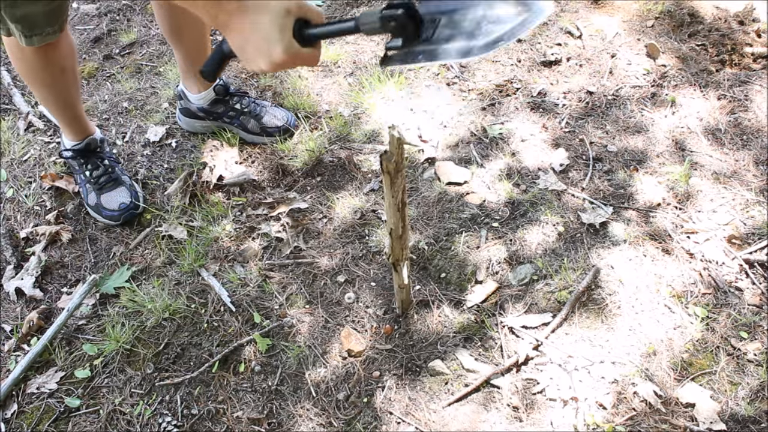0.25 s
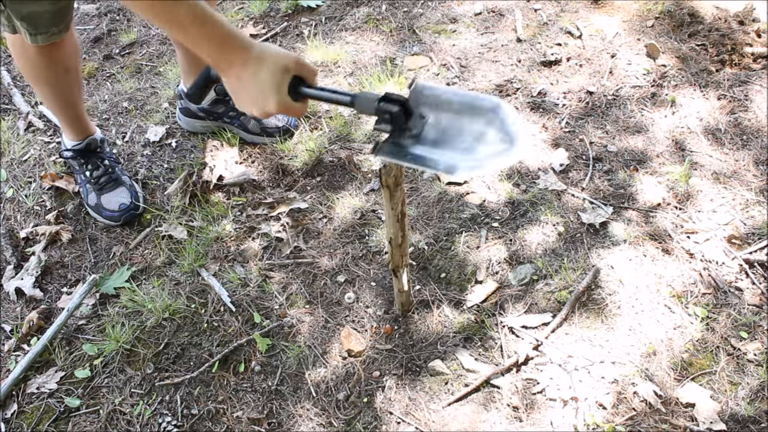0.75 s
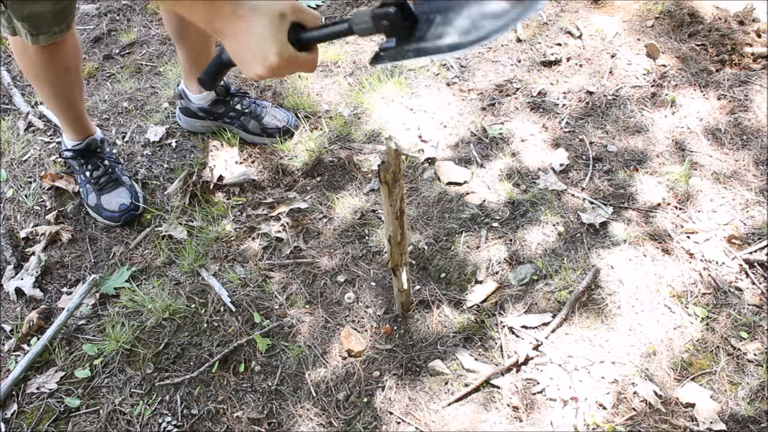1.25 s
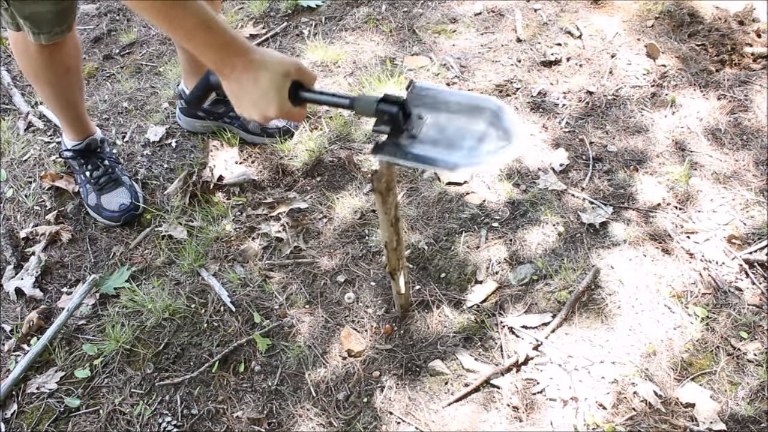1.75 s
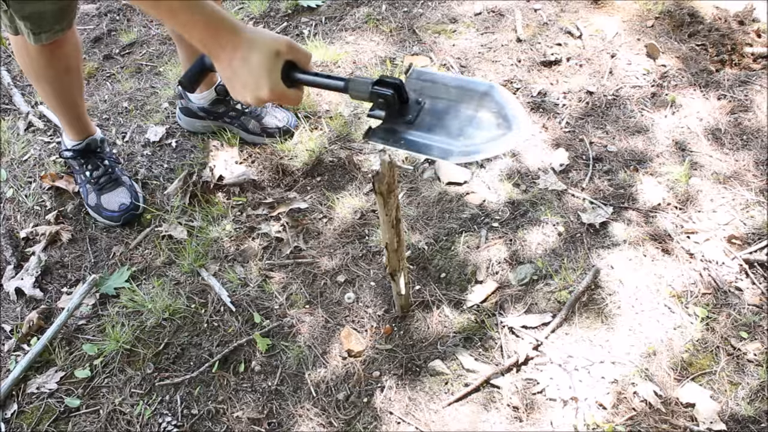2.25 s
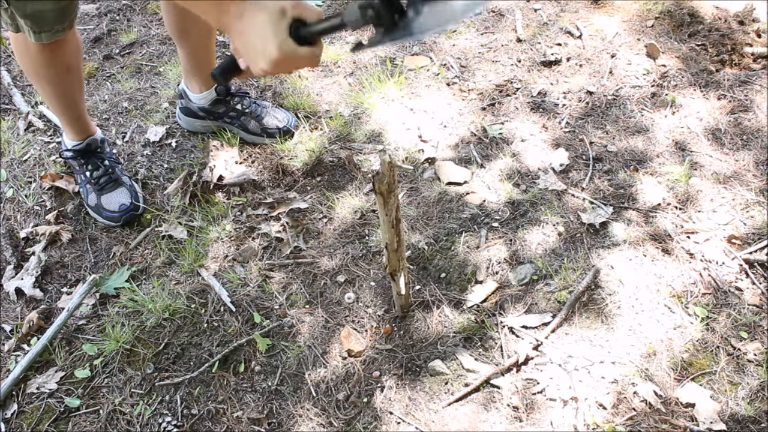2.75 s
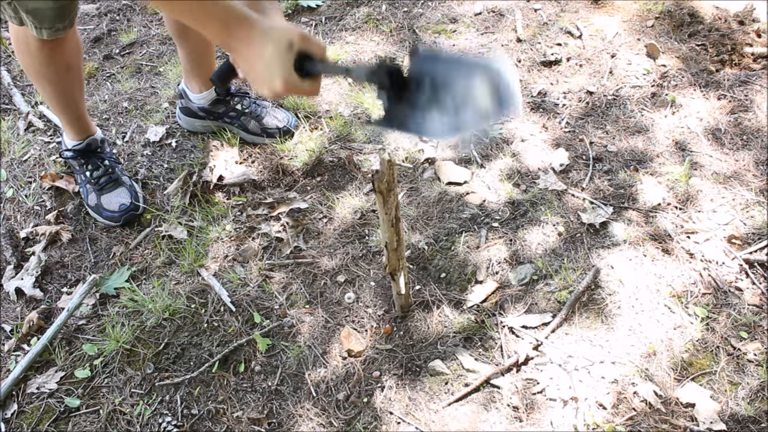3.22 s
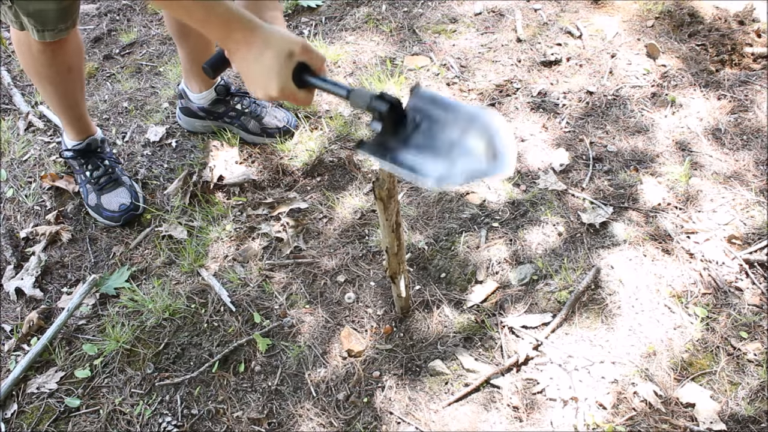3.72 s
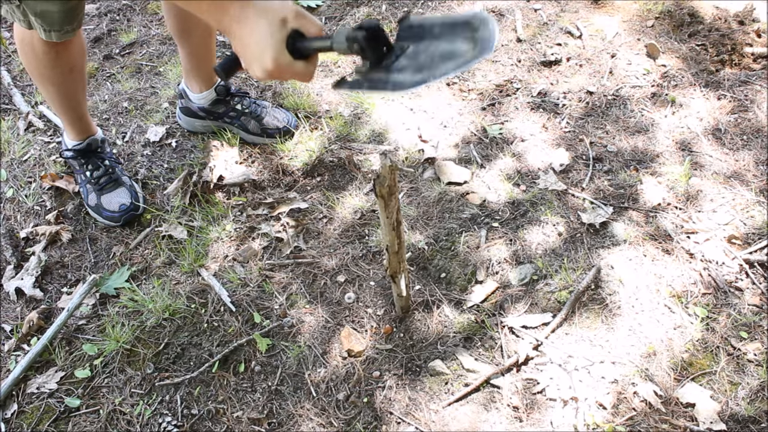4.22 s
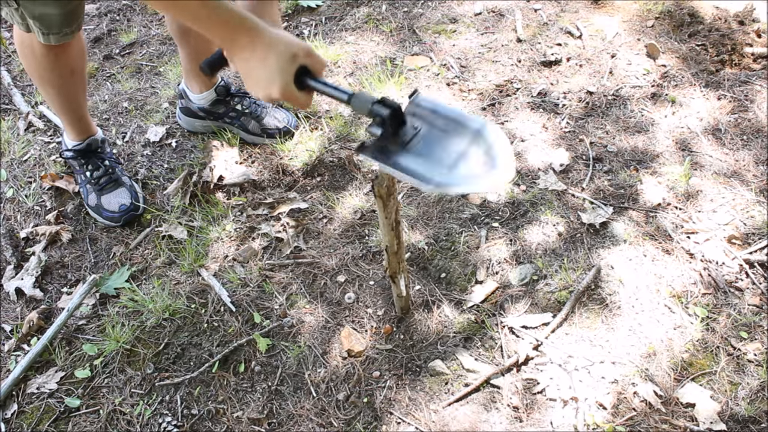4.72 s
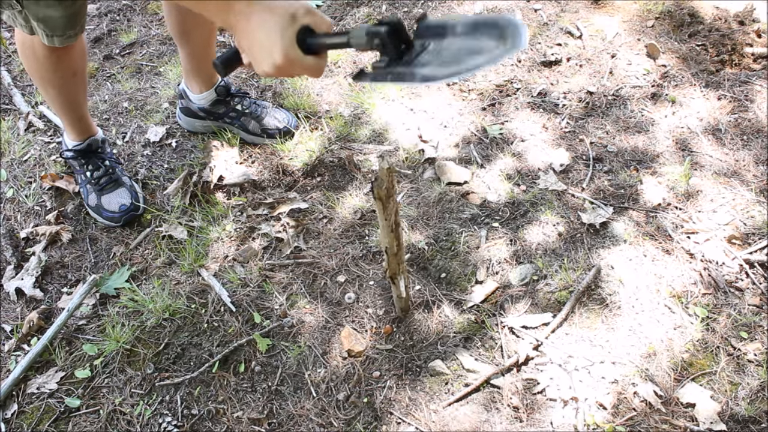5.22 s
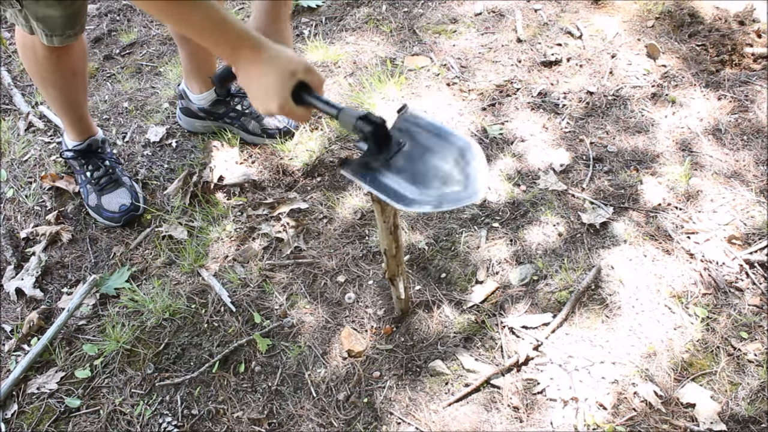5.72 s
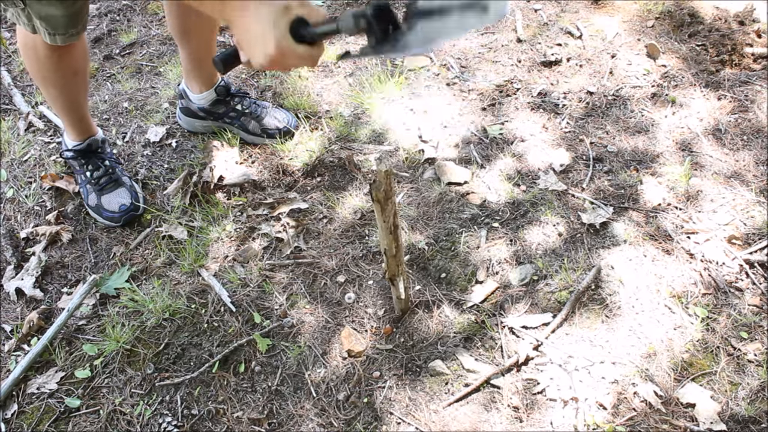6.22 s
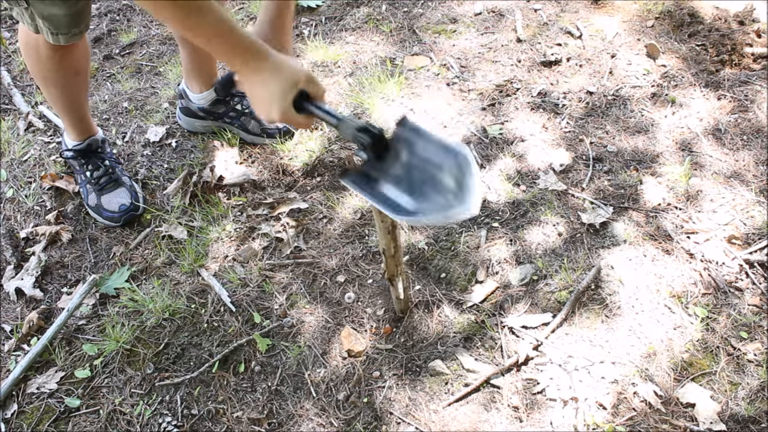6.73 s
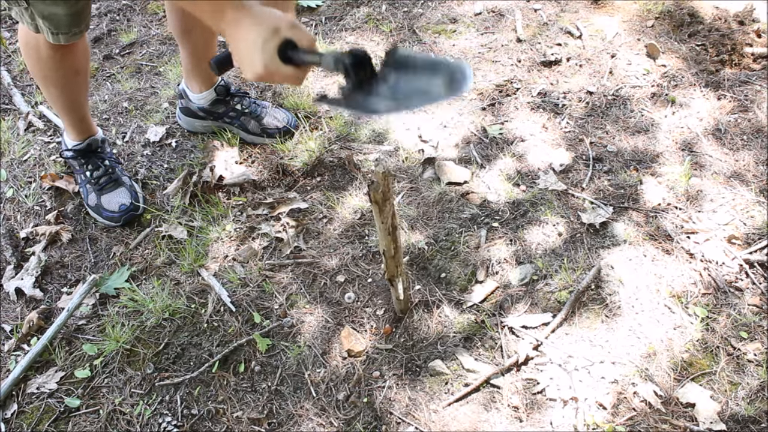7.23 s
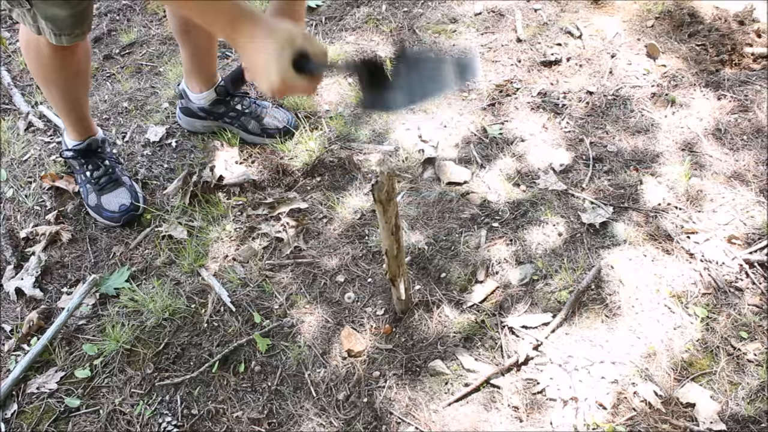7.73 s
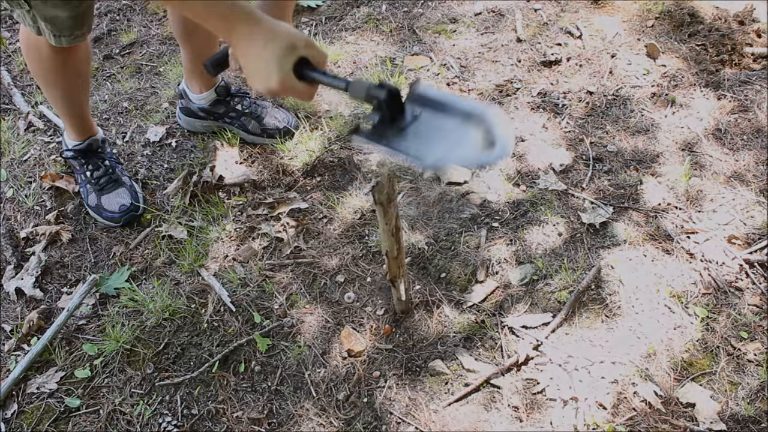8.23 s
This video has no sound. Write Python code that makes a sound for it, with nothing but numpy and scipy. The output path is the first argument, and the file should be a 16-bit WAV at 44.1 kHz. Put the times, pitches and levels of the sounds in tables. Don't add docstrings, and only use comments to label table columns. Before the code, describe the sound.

Steady, overloaded metallic clanks of a folding shovel hammering a stake outdoors, with ringing blade, loose joint ticks and faint insect chirps.

```python
import sys
import numpy as np
from scipy import signal
from scipy.fft import rfft, irfft, next_fast_len
from scipy.io import wavfile

SR = 44100
rng = np.random.default_rng(int(sys.argv[2]) if len(sys.argv) > 2 else 0)


def ratio_of_db(decibels):
    return 10 ** (np.asarray(decibels, float) / 20)


def digitize_waveform(pressure):
    field = np.atleast_2d(pressure).T
    bounded = np.clip(field, -1, 1)
    quanta = np.round(bounded * 32767).astype(np.int16)
    wavfile.write(sys.argv[1], SR, quanta)


N = 373292
AFTER = np.arange(SR // 5) / SR


def unit(x):
    return x / np.sqrt(np.mean(x ** 2) + 1e-20)


def along(points, hz):
    f, v = np.transpose(points)
    return np.interp(np.log(hz + 1), np.log(f + 1), v)


def curves(rows):
    s, *cols = np.transpose(rows)
    return [np.interp(np.arange(N) / SR, s, c) for c in cols]


def wobble(rate, size=N):
    knots = rng.standard_normal(512)
    return np.interp(np.arange(size) * rate / SR, np.arange(len(knots)), knots)


def filtered(x, response):
    m = next_fast_len(len(x) + SR // 2)
    return irfft(rfft(x, m) * response(np.fft.rfftfreq(m, 1 / SR)), m)[:len(x)]


def add(track, s, x):
    part = track[round(s * SR):][:len(x)]
    part += x[:len(part)]


# t/s, firmness/0-1
FIRMNESS = [(0, .05), (2.3, 0.2), (3.2, 0.3), (4.5, .6), (6, 1), (7.3, .95), (8.4, 0.5)]


def sunk(s, loose, firm):
    return loose + (firm - loose) * np.interp(s, *np.transpose(FIRMNESS))


# f/Hz, level/dB per Hz
HUM_SPECTRUM = [(30, -4), (90, 0.5), (280, -4), (700, -2), (1400, -0.5), (2200, -5), (4000, -7.5),
                (6000, -15.5), (9500, -23), (15600, -24.5), (15900, -60)]
# t/s, level/dB rms of its low band
AIR_LEVEL = [(0, -58.5), (.6, -63.5), (1.3, -65), (2.4, -68.5), (2.62, -59), (2.75, -55), (2.95, -59.5),
             (3.2, -66.5), (4.5, -71), (5.6, -74), (7.3, -72.5), (7.75, -65), (8, -65), (8.4, -69.5)]


def air():
    t, blows = np.arange(N) / SR, np.array(BLOW_S + [8.53])
    next_blow = blows[np.searchsorted(blows, t)]
    rise_db = sunk(t, loose=7, firm=8.5) * np.exp((t - next_blow) / 0.038)
    gain_db, = curves(AIR_LEVEL)
    hum = unit(filtered(rng.standard_normal(N), lambda f: ratio_of_db(along(HUM_SPECTRUM, f))))
    return ratio_of_db(gain_db + rise_db + 10.5 + 1.2 * wobble(6.5)) * hum


# t/s, level/dB
CRICKET_CHIRPS = [(.48, -57), (2.372, -61), (2.679, -53), (3.295, -55), (3.63, -59), (4.7, -62),
                  (6.58, -68), (6.93, -68), (7.58, -62), (7.83, -62), (8.13, -64)]


def cricket():
    out, t = np.zeros(N), AFTER[AFTER < .042]
    stroke = t / .007 % 1
    tone = np.sin(2 * np.pi * np.cumsum(9250 - 550 * stroke ** 2) / SR)
    for s, db in CRICKET_CHIRPS:
        swell = ratio_of_db(db + 3 + 180 * (t - .03))
        add(out, s, swell * np.sin(np.pi * stroke) * tone)
    return out


# f/Hz, level/dB per Hz
SCATTER_SPECTRUM = [(100, -12), (400, -6), (900, -6), (1900, 9), (2500, -6.5), (4000, 2), (6000, -6.5),
                    (9000, -13.5), (15000, -27)]
# f/Hz, t60/s
SCATTER_DECAY = [(150, .12), (1000, 0.35), (1900, 0.2), (4000, 0.53), (15000, 0.29)]


def scatter():
    out = np.zeros(N)
    for s, (db, *_) in zip(BLOW_S, BLOW_SETTINGS):
        hz, t, z = signal.stft(rng.standard_normal(len(AFTER)), SR, nperseg=256)
        streaks_db = rng.normal(0, 5.5, (len(hz), 1))
        t60 = along(SCATTER_DECAY, hz)[:, None]
        fade = .048 * ratio_of_db(streaks_db - 60 * t / t60) + 2.6 * ratio_of_db(-60 * t / .04)
        tail = z * fade * ratio_of_db(along(SCATTER_SPECTRUM, hz))[:, None]
        add(out, s + 0.000998, ratio_of_db(0.61 * db - 9) * signal.istft(tail, SR)[1])
    return out


# t/s, chatter peak level near 2 kHz/dB, bright tick level/dB
JOINT_TICKS = [(0.099, -33, -23.5), (0.293, -37, -86), (0.414, -38, -24.5), (0.487, -40, -35),
               (0.641, -44, -66), (0.771, -36, -24.5), (0.787, -15, -39.5), (0.796, -23.5, -35),
               (0.848, -49, -60), (0.98, -39.5, -91), (1.108, -33.5, -28), (1.19, -54, -59),
               (1.301, -38.5, -39), (1.447, -31, -24.5), (1.65, -47, -50), (1.788, -32, -32.5),
               (1.99, -42.5, -50), (2.215, -38, -41), (2.63, -62, -37), (2.801, -37.5, -47),
               (2.967, -34, -26.5), (3.2, -54.5, -35.5), (5.933, -52, -47), (6.282, -56.5, -45.5),
               (7.493, -20.5, -60), (7.658, -59, -37.5)]
# f/Hz, width/Hz, level/dB
COLLAR_MODES = [(544, 45, 0), (1330, 600, -6.5), (1890, 43, 7.5), (3130, 560, -4.5), (3300, 450, -6),
                (4450, 43, -5.5)]


def collar(f):
    total = 0
    for k, (centre, width, db) in enumerate(COLLAR_MODES):
        damping = 1j * f * width
        total = total + (-1) ** k * ratio_of_db(db) * damping / (centre * centre - f * f + damping)
    return total


def bright(f):
    return ratio_of_db(4) * (1j * f / (3000 + 1j * f) * 9000 / (9000 + 1j * f)) ** 2


def joint():
    chatter, tick, t = np.zeros(N), np.zeros(N), AFTER
    for s, db, tick_db in JOINT_TICKS:
        add(chatter, s, ratio_of_db(db + 22 - 60 * t / 0.045) * rng.standard_normal(len(t)))
        add(tick, s, ratio_of_db(tick_db - 5 - 60 * t / 0.035) * rng.standard_normal(len(t)))
    return filtered(chatter, collar) + filtered(tick, bright)


def dead_db(s, t, loose_s, loose_db, firm_s, firm_db, width):
    return sunk(s, loose_db, firm_db) * np.exp(-((t - sunk(s, loose_s, firm_s)) / width) ** 2)


SHARP_NULLS = {3928.5: (.1, 21, .1, -30, .01), 4442: (.11, 17, .07, 0, .01), 2053: (.21, 10, .15, 14, .012)}


def null(s, t, hz):
    *dead, width = SHARP_NULLS.get(hz, (0, 0, 0, 0, 1))
    loss_db = dead_db(s, t + rng.normal(0, .012), *dead, width)
    return ratio_of_db(-np.maximum(loss_db, 0))


def beam(t, depth, rate):
    return 1 + depth * wobble(rate, size=len(t)) * np.minimum(t / 0.066, 1)


# t/s after a blow, speed/(m/s)
SWING_SPEED = [(0, -0.84), (.14, 1), (.25, 0.11), (.4, -2.5), (.6, -.3), (.7, -0.63)]
# f/Hz, t60/s
LONG_MODES = [(927.9, 1.6), (1476.8, 8), (2683, 4), (3928.5, 1.5)]
# level/dB rms of the four modes, low to high, and the ping
LONG_LEVELS = [(-47.5, -42, -52, -60.5, -77), (-51.5, -44, -45, -65, -83), (-60, -53, -40, -45, -84),
               (-62.5, -46, -56, -50.5, -83.5), (-56, -52.5, -34.5, -48.5, -88), (-56, -53, -36, -49, -83),
               (-60, -50, -41, -46.5, -76.5), (-57, -55, -46, -45.5, -82), (-50, -48, -35.5, -35.5, -80.5),
               (-49.5, -47.5, -44, -37, -79), (-52, -48.5, -41, -42, -88), (-44.5, -46, -41.5, -39.5, -75),
               (-53, -51.5, -50, -54.5, -83), (-51.5, -50, -40.5, -40.5, -83),
               (-50.5, -53, -51.5, -42, -86), (-47.5, -50.5, -38.5, -43, -69),
               (-50.5, -51.5, -44.5, -41, -72), (-46.5, -54, -49, -46, -70),
               (-48.5, -60.5, -49, -39.5, -64), (-46.5, -61.5, -45.5, -43, -67),
               (-54.5, -50.5, -50.5, -49.5, -88), (-50, -49.5, -38, -51.5, -85),
               (-43.5, -49.5, -43.5, -39, -83)]
# t/s after the blow, loss/dB (loose stake), t/s, loss/dB (firm stake), width/s
LONG_DEAD = [(.26, 6, 0.24, 19, 0.045), (0.24, 0.76, .24, 5.6, 0.018), (0.041, 3.3, 0.23, 1.4, .07),
             (0.058, 1.5, 0.3, 8.4, 0.05)]
# f/Hz, t60/s
SHORT_MODES = [(2053, .45), (3306, .9), (4442, .7), (5100, .6), (8390, .28)]
SHORT_LEVELS = [(-41, -61, -52, -81.5, -70.5), (-52, -68.5, -55.5, -68, -56.5),
                (-49.5, -65, -52.5, -78, -71.5), (-54.5, -51.5, -65, -72.5, -70),
                (-45.5, -52.5, -50, -65, -79), (-48.5, -50, -51.0, -70.5, -63),
                (-52, -54.5, -45, -66.5, -65.5), (-46, -45, -43, -71, -63), (-48, -55, -43.5, -50.5, -70),
                (-51, -56, -57, -66.0, -68), (-48.5, -56, -46, -58, -59), (-52.0, -52.5, -42.5, -44.5, -57),
                (-55.5, -54.0, -42.5, -70, -73), (-52.5, -66, -45.5, -68, -80),
                (-57.5, -61, -43.5, -56, -78), (-51.0, -60, -50, -47, -64), (-53.0, -61, -40, -44, -71),
                (-62, -71, -43.5, -48, -74), (-55.5, -66, -48, -54, -62.5), (-52, -71, -46, -54, -60),
                (-68, -65, -45, -66, -71), (-56, -63.5, -45, -49.5, -66), (-49, -63, -41.5, -60.5, -62.5)]
SHORT_DEAD_ANGLES = [(0.12, 2.6, 0.26, 4, 0.015), (0.032, 5, 0.18, 2.5, 0.014),
                     (0.13, 8.4, 0.32, 4.3, 0.028)]
# f/Hz, level/dB, t60/s
FAINT_MODES = [(1330, -48.5, 0.1), (3564, -42.5, 0.16), (4950, -43, .2), (5675, -41.5, 0.26),
               (6300, -45, 0.21), (7850, -50, 0.17), (9600, -52.5, 0.092), (11230, -52, 0.12)]
REST_S, REST_DB_PER_S = 2.8, 54
PING_HZ, PING_T60 = 10630, .22


def ring():
    out = np.zeros(N)
    ends = BLOW_S[1:] + [8.5]
    for s, end, (*long_db, ping_db), short_db in zip(BLOW_S, ends, LONG_LEVELS, SHORT_LEVELS):
        t = np.arange(round((end - s) * SR)) / SR
        downswing = 4.5 * np.exp((s + t - end) / 0.052)
        speed = np.interp(t, *np.transpose(SWING_SPEED)) - downswing
        turn = 2 * np.pi * np.cumsum(1 + speed / 343) / SR

        rest_db = REST_DB_PER_S * np.maximum(s + t - REST_S, 0) * (s < REST_S)
        fresh_db = 7.2 + 5 * np.exp(-t / 0.0066) - rest_db
        x = np.zeros(len(t))
        for (hz, t60), dead, db in zip(LONG_MODES, LONG_DEAD, long_db):
            level = ratio_of_db(db + fresh_db - 60 * (t - .18) / t60 - dead_db(s, t, *dead))
            x += level * null(s, t, hz) * beam(t, 0.088, 25) * np.sin(hz * turn)

        for k, ((hz, t60), db) in enumerate(zip(SHORT_MODES, short_db)):
            if k < len(SHORT_DEAD_ANGLES):
                db = db + 8.0 - dead_db(s, t, *SHORT_DEAD_ANGLES[k])
            else:
                db = db + 0.5
            level = ratio_of_db(db - 60 * (t - .1) / t60)
            x += level * null(s, t, hz) * beam(t, .2, 25) * np.sin(hz * turn)

        for hz, db, t60 in FAINT_MODES:
            level = ratio_of_db(db + rng.normal(0, 3.5) - 60 * t / t60)
            x += level * beam(t, .6, 40) * np.sin(hz * turn)

        ping = ratio_of_db(ping_db + 3 - 60 * (t - .075) / PING_T60) * np.minimum(t / .03, 1)
        x += ping * np.sin(PING_HZ * turn)
        buzz = wobble(130, size=len(t)) * wobble(22, size=len(t))
        x += ratio_of_db(sunk(s, -54, -47) - 60 * t / .9) * buzz * np.sin(1858 * turn)
        add(out, s, x)
    return out


def struck(modes, spread_db, detune):
    hz, db, t60 = np.transpose(modes)[:, :, None]
    level, bend = rng.standard_normal((2, len(modes), 1))
    envelope = ratio_of_db(db + spread_db * level - 60 * AFTER / t60)
    return np.sum(envelope * np.sin(2 * np.pi * hz * (1 + detune * bend) * AFTER), axis=0)


BLOW_S = [.0656, .429, .7783, 1.1208, 1.4563, 1.7919, 2.1375, 2.9837, 3.3469, 3.6882, 4.0271, 4.3885,
          4.7351, 5.0781, 5.4119, 5.7625, 6.0953, 6.4369, 6.7892, 7.141, 7.4782, 7.8502, 8.1819]
# clang peak level/dB, clang f/Hz, contact/ms, upper plate level/dB re clang, joint slap level/dB
BLOW_SETTINGS = [(-0.5, 1792, 5.3, -11, -21.5), (0, 1572, 7.2, -13.5, -9), (-2.5, 1701, 10, -14, -42),
                 (0, 1780, 7.6, -16, -37), (2, 1500, 4.6, -15, -17), (-2, 1630, 7.4, -3.5, -11.5),
                 (-1, 1591, 2.6, -8, -12.5), (1.5, 1777, 8, -5, -4.5), (-2, 1901, 6.5, -1.5, -11),
                 (0.5, 1736, 4.2, -9.5, -20.5), (1, 1756, 4, -18, -19), (0.5, 1600, 6.8, -12, -11),
                 (-1, 1832, 6.2, -12.5, -16), (-4, 1567, 5.4, -7, -20), (-1.5, 1584, 3.9, -8.5, -17),
                 (0, 1710, 5.2, -14, -13.5), (2.5, 1690, 4.5, -13.5, -16), (-1.5, 1647, 5.6, -11, -19.5),
                 (1, 1673, 3.5, -13, -17), (1, 1662, 7.1, -17, -15.5), (-6, 1882, 8.3, -10.5, -24.5),
                 (-2.5, 1690, 7.7, -5, -21), (4, 1672, 4.6, -7.5, -8)]
# f/Hz, level/dB, t60/s
PLATE_MODES = [(3009, 4.5, 0.031), (3435, -2.5, 0.047), (4074, 3, 0.021), (4794, -3, .03),
               (4880, -9.5, 0.0089), (6175, -10.5, 0.083), (8220, -6.5, 0.036)]
# f/Hz, level/dB, t60/s
WOOD_MODES = [(65, -48.5, 0.4), (148.5, -21.5, 0.075), (324, -22.5, 0.021), (878, -17.5, 0.063),
              (1279, -32, 0.098)]
BOWL_DB, BOWL_FOLLOWS = -2.5, 0.5
SLAP_MS = 5


def clang():
    out, t = np.zeros(N), AFTER
    for s, (db, hz, contact_ms, plate_db, slap_db) in zip(BLOW_S, BLOW_SETTINGS):
        bowl_db = BOWL_DB + BOWL_FOLLOWS * plate_db
        stake_db = sunk(s, loose=-4, firm=-14.5)
        modes = [(hz, 0, .05), (955, bowl_db - 0.5, .05), (505, stake_db - 4.5, .08),
                 (1.0 * hz, -12, .04), (.85 * hz, -12, .04), (1230, -10, .045), (770, stake_db - 8, .045)]
        body = struck(modes, spread_db=1.74, detune=0.038)
        plate = ratio_of_db(plate_db - .6) * struck(PLATE_MODES, spread_db=2.5, detune=.02) * (1 - np.exp(-t / .0015))
        lifted = 1 / (1 + np.exp(-(t - contact_ms / 1e3) / 0.00035))
        steel = ratio_of_db(-16 * lifted) * body + ratio_of_db(-4 * lifted) * plate

        late = np.maximum(t - SLAP_MS / 1e3, 0)
        slap_fade = ratio_of_db(-60 * late / 0.0096) * (late > 0) + .3 * ratio_of_db(-60 * t / 0.016)
        slap = ratio_of_db(slap_db + 6.5) * rng.standard_normal(len(t)) * slap_fade

        wood = struck(WOOD_MODES, spread_db=1.5, detune=.03)
        thud_db = sunk(s, loose=0.5, firm=-6.5)
        blow = ratio_of_db(db + 2.2) * steel + ratio_of_db(db + thud_db) * wood + slap
        add(out, s, blow * (1 - np.exp(-t / .0003)))
    return out


def scene():
    return (air() + cricket() + scatter() + joint() + ring() + clang())[None]


def top_cut(x):
    return signal.sosfilt(signal.butter(12, 16370, fs=SR, output="sos"), x)


def record(dry):
    clipped = np.clip(dry[0], -1, 1)
    band = filtered(clipped, lambda hz: ratio_of_db(np.interp(hz, [15000, 16300, 16450], [0, -11, -60])))
    return top_cut(band[None])


dry = scene()
out = record(dry)
digitize_waveform(out)
```